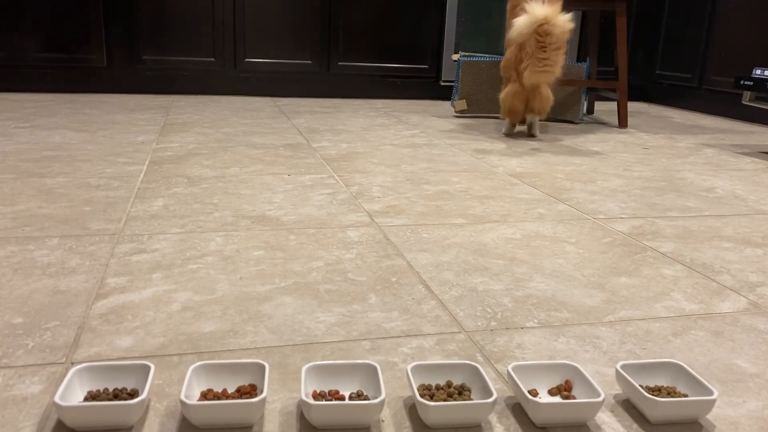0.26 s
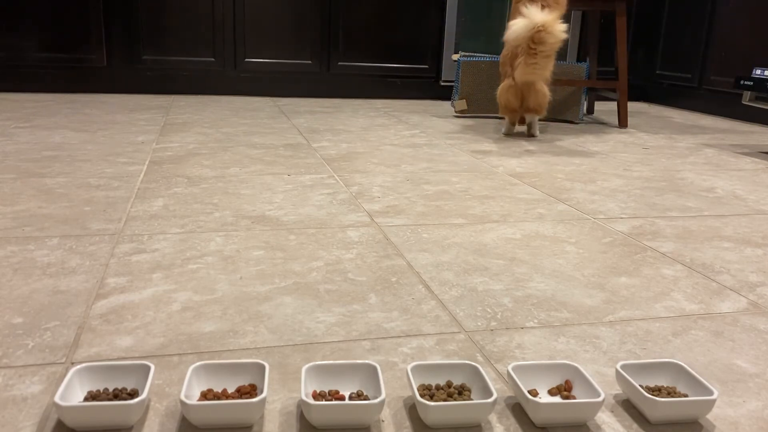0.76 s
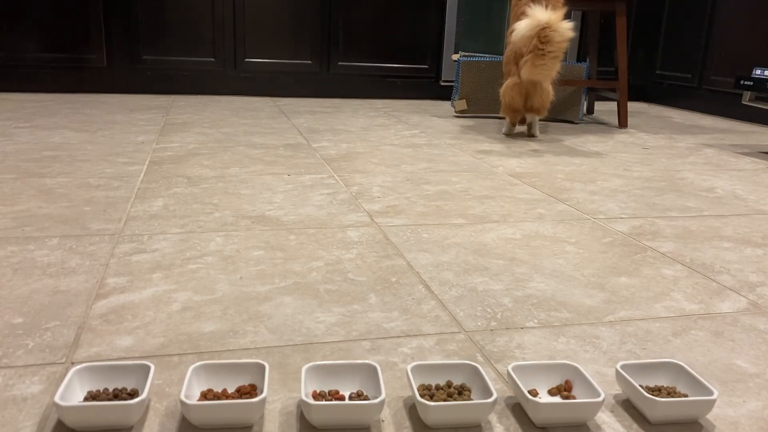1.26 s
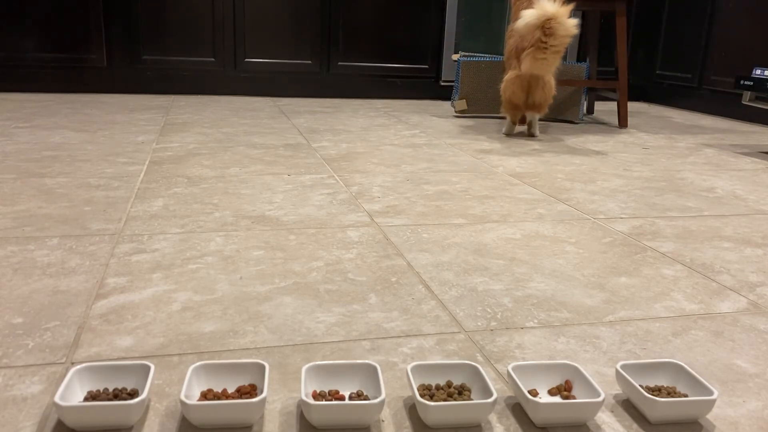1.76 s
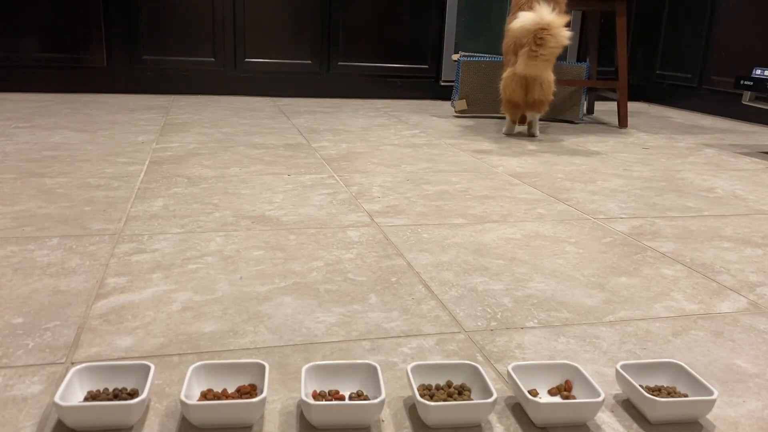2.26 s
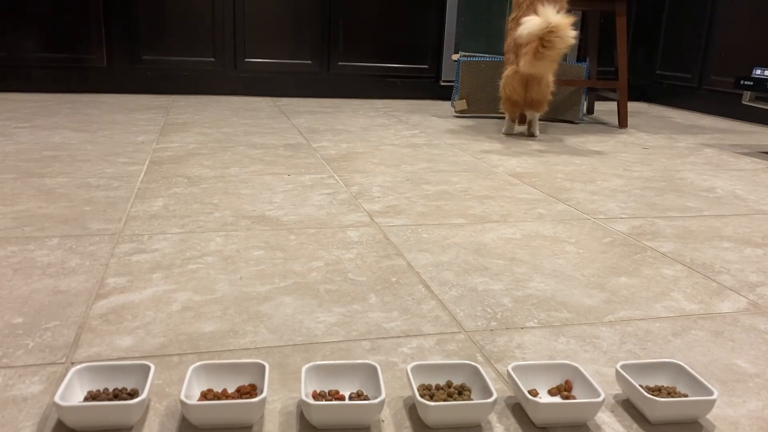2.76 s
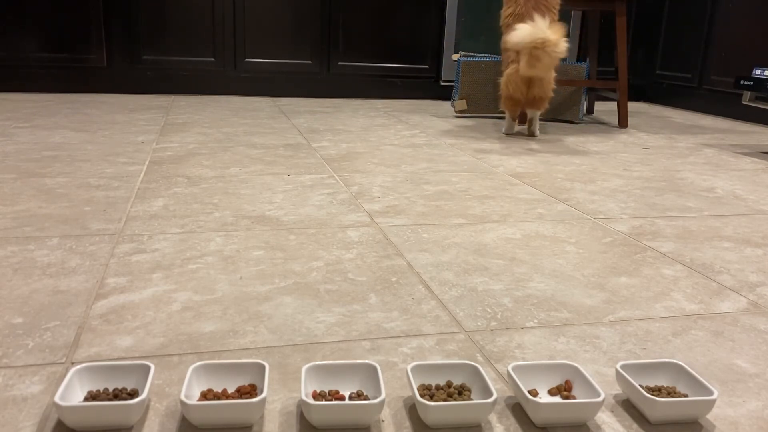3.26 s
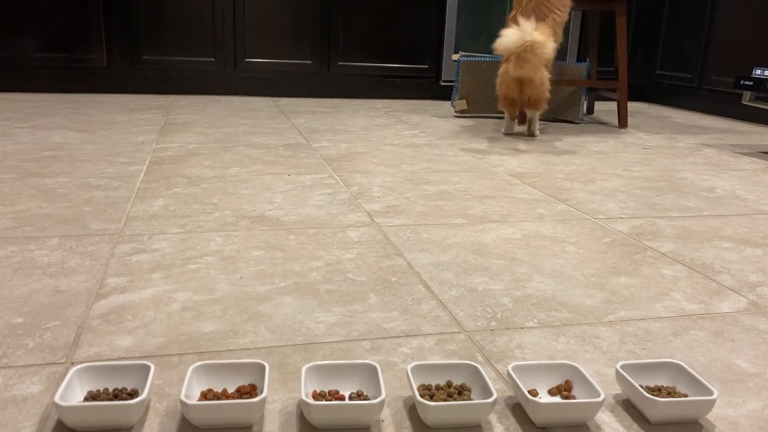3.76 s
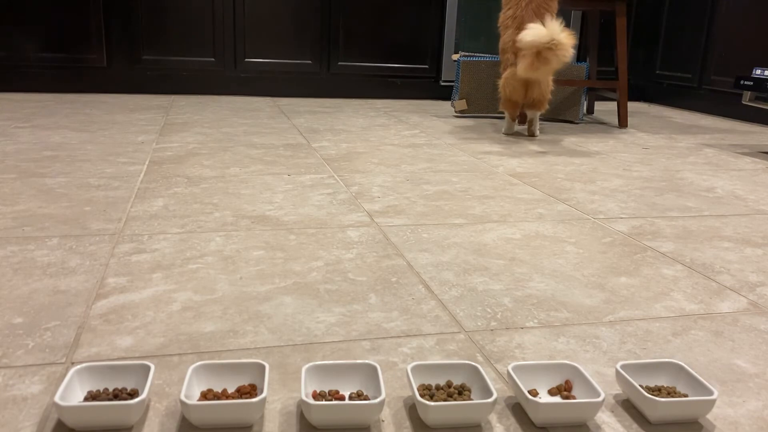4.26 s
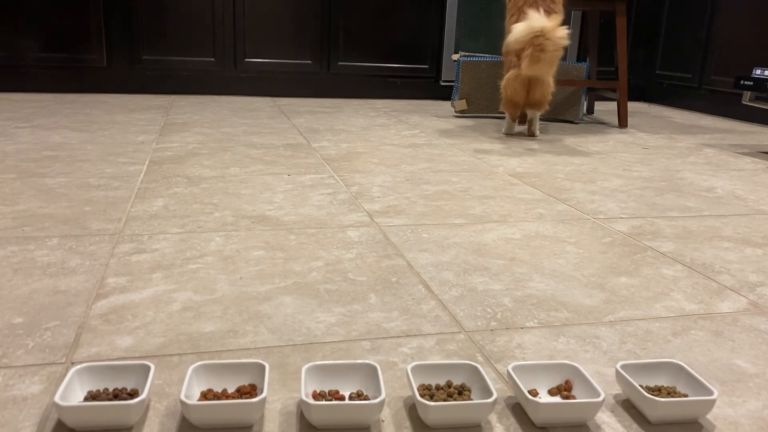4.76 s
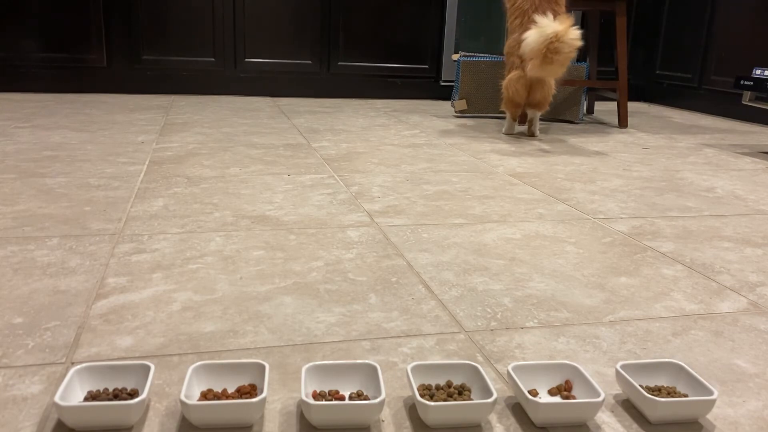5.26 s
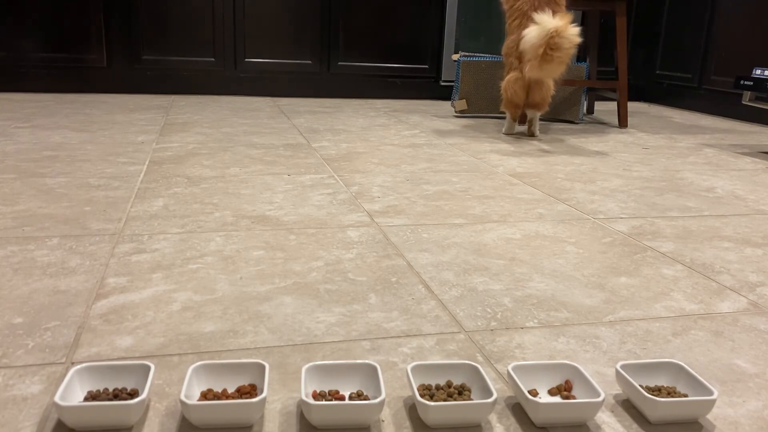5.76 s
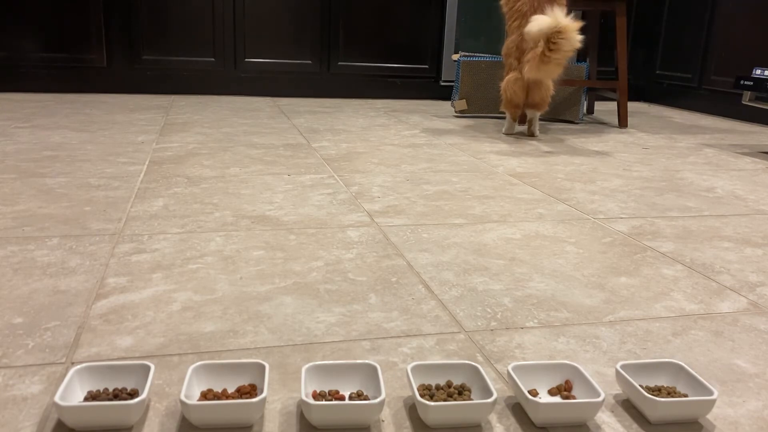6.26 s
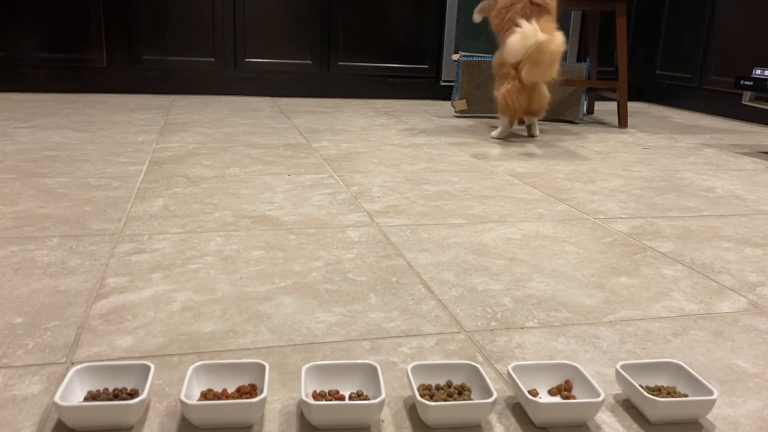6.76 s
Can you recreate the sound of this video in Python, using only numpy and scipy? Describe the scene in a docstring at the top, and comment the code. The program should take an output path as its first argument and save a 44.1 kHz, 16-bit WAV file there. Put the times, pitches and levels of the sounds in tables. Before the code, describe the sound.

Across a hard tiled room, a cat works its claws on a hollow box. Faint scrapes and ticks come first, then sharper crackling plucks with dull hollow thumps. Around two seconds the box judders briefly on the floor. Strong scratches peak until about three and a half seconds, then only a few isolated plucks remain over faint hum and hiss. The stereo microphone is several steps away.

```python
"""In a hard tiled room, a cat stands against a hollow box and works its front claws into it.
Each claw drags over tiny catches, then plucks free: fibres crack and tick, and the surface snaps back.
The box's panels thump as decaying modes; the box rocks, judders over the floor and sways with a rumble.
A microphone pair across the room hears the echoes and tail of every hit, over a low hum and faint hiss."""
import sys
import numpy as np
from scipy import signal
from scipy.fft import rfft, irfft, next_fast_len
from scipy.io import wavfile

SR = 44100
rng = np.random.default_rng(int(sys.argv[2]) if len(sys.argv) > 2 else 0)


def generate_wav(signal):
    """Clip the signal to [-1, 1] and save it as 16-bit WAV at the path in sys.argv[1]."""
    frames = np.transpose(np.atleast_2d(signal))
    scaled = np.clip(frames, -1, 1) * 32767
    pcm = np.round(scaled).astype(np.int16)
    wavfile.write(sys.argv[1], SR, pcm)


N = 309141  # length in samples

# Claws plucking free. Each row: time in seconds, snap in dB, crack in dB, tick in dB,
# thump of the box in dB before a small trim, shredding from 0 (one clean catch) to 1 (a long tear).
PLUCKS = [(0.002, -55.5, -53, -67, -52.5, 0.74), (0.107, -56, -55.5, -97, -61, 0.04),
          (0.175, -57.5, -62.5, -69, -51.5, 0), (0.392, -42, -46.5, -64, -47, 0.5),
          (0.541, -57, -63, -69, -56, 0.3), (0.593, -63, -62, -70.5, -74, 0.35),
          (0.654, -59.5, -64, -74.5, -59, 1), (0.802, -58, -78.5, -80.5, -53.5, 0),
          (0.909, -66.5, -77, -77.5, -55.5, 0.44), (1.224, -68, -74, -79.5, -57, 0.5),
          (1.277, -48, -47.5, -56, -47.5, 0.57), (1.655, -49.5, -47.5, -53, -40, 0.33),
          (2.006, -84, -71, -77, -65, 0.8), (2.225, -51.5, -59.5, -72.5, -42.5, 0.7),
          (2.262, -42.5, -44, -55.5, -33.5, 1), (2.509, -57, -64.5, -74.5, -52.5, 0.3),
          (2.585, -61, -60, -66, -60.5, 0.22), (2.712, -52, -54.5, -66.5, -51.5, 0.2),
          (2.869, -40.5, -41.5, -52, -41, 0.6), (2.970, -47, -48.5, -59, -50, 0.12),
          (3.249, -57.5, -71, -89.5, -43, 0.1), (3.341, -53.5, -52, -62.5, -45, 0.46),
          (3.418, -37, -47.5, -54, -33.5, 0.1), (3.963, -40.5, -49, -61.5, -43, 0.57),
          (4.639, -64.5, -67.5, -97, -55.5, 0.76), (5.627, -42.5, -57, -62, -38, 0.15)]
# Colour of a dull knock on the box. Each row: frequency in Hz, relative level in dB.
KNOCK_COLOUR = [(100, -36), (400, 2), (600, 9), (750, 3.5), (950, 1.5), (1300, -1), (2000, -10.5),
                (5000, -38.5)]


def gain_of(db):
    """Decibels to amplitude."""
    return 10 ** (np.asarray(db) / 20)


def evened(x):
    """Scales to rms 1."""
    return x / np.sqrt(np.mean(x ** 2) + 1e-20)


def read(points, hz):
    """Reads a table on a logarithmic frequency axis."""
    f, value = np.transpose(points)
    return np.interp(np.log(hz + 1), np.log(f + 1), value)


def add(mix, s, sound):
    """Adds a stereo sound at time s."""
    part = mix[:, max(round(s * SR), 0):][:, :sound.shape[1]]
    part += sound[:, :part.shape[1]]


def at_level(wet, db, size=1500):
    """Sets a hit's rms level over its first moments (size in samples)."""
    return gain_of(db) * wet / np.sqrt(np.mean(wet[:, :size] ** 2) + 1e-20)


def click(colour, size=2048):
    """The minimum-phase click: the most compact causal one with a given spectrum."""
    log_gain = np.log(gain_of(read(colour, abs(np.fft.fftfreq(size, 1 / SR)))))
    spectrum = np.exp(np.conj(signal.hilbert(log_gain)))
    return np.fft.ifft(spectrum).real[:size // 2]


def diffuse(pair):
    """Makes two unrelated signals as alike as two close microphones hear a room."""
    # Likeness of the channels. Each row: frequency in Hz, likeness from 0 to 1.
    likeness = [(60, 0.93), (150, 0.9), (350, 0.5), (700, .25), (1400, 0.05), (3000, 0.5), (5500, 0.4),
                (7500, 0.9), (16000, 1)]
    a, b = rfft(pair)
    same = np.clip(read(likeness, np.fft.rfftfreq(pair.shape[1], 1 / SR)), -1, 1)
    common = np.sqrt((1 + same) / 2) * a
    apart = np.sqrt((1 - same) / 2) * b
    return irfft([common + apart, common - apart], pair.shape[1])


def room(build_s=0.0059, direct=1.0, size=20000):
    """Direct sound, first echoes, and a dense noise tail drawn afresh for each place."""
    # The tail. Each row: frequency in Hz, decay by 60 dB in seconds, relative level in dB.
    tail_bands = [(102.3, 0.3, 9), (330, 0.43, 9.5), (630, 0.53, 12), (1210, 0.46, 15), (2920, .47, 10.5),
                  (7000, 0.4, 10.5), (11150, .33, 7.5), (15040, 0.16, 8)]
    # Echoes from floor and cabinets. Each row: delay in seconds, strength, right microphone's lead in seconds.
    echoes = [(.0053, -.45, .00005), (.0064, .75, .00002), (.0075, .45, .0001), (.0115, -.5, -.00005),
              (.0165, .5, .0001), (.0242, .3, -.0001)]
    hz, t, z = signal.stft(diffuse(rng.standard_normal((2, size))), SR, nperseg=512)
    t60, level_db = (read(np.array(tail_bands)[:, [0, k]], hz)[:, None] for k in (1, 2))
    z *= gain_of(level_db - 60 * t / t60)
    z *= np.sqrt(2 * np.log(1000) / t60 / SR)  # equal energy for any decay time
    build = 1 - np.exp(-(np.arange(size) / SR / build_s) ** 2)
    response = signal.istft(z, SR)[1][:, :size] * build
    low = signal.firwin(25, 6000, fs=SR)
    for delay, strength, lead in [(0.0014, direct, .00013)] + echoes:
        right = np.zeros(size)
        right[round(delay * SR) + len(low) // 2] = strength
        # below about 6 kHz the left microphone hears it later by the lead (sooner if negative)
        lag = np.roll(right, round(lead * SR)) - right
        response += [right + np.convolve(lag, low, "same"), right]
    return response


def carry(sound, space):
    """Carries a short sound through the room to both microphones."""
    return signal.fftconvolve(sound[None], space, axes=1)


def cornered(space, early_s=0.02, tail_db=-6):
    """Close to floor and cabinets, the box's early echoes outweigh the room's tail in its thump."""
    t = np.arange(space.shape[1]) / SR
    return space * gain_of(tail_db / (1 + np.exp(-4 * (t / early_s - 1))))


def facing(space, shredding, clean_db=6.5, size=150):
    """A clean single catch aims more of its sound straight at the microphones than a long tear."""
    boost = gain_of(clean_db * np.clip(1 - shredding, 0, 1) ** 3)
    return space * np.where(np.arange(space.shape[1]) < size, boost, 1)


def background(air_db=-67, hum_hz=64, hum_width_hz=5, hum_db=-70.5):
    """Still room air as coloured noise, and a low hum as narrow noise that wavers about a steady level."""
    # Colour of the air. Each row: frequency in Hz, relative level in dB.
    air_colour = [(15, -57), (25, -39.5), (43, -12), (64, -3.5), (134, -22.5), (166, -18), (190, -24.5),
                  (223, -18.5), (373, -28.5), (476, -28), (531, -33.5), (911, -34.5), (1230, -42),
                  (11000, -54.5), (14000, -60), (16000, -68.5)]
    hz = np.fft.rfftfreq(N, 1 / SR)
    air = irfft(rfft(diffuse(rng.standard_normal((2, N)))) * gain_of(read(air_colour, hz)), N)
    hum = irfft(rfft(rng.standard_normal(N)) / (1 + ((hz - hum_hz) / hum_width_hz) ** 2), N)
    return gain_of(air_db) * evened(air) + gain_of(hum_db) * evened(hum)


def rumble(shaking, settle_s=0.057, level_db=-59):
    """The whole box sways with a low rumble that swells whenever it is shaken and then settles."""
    # Colour of the swaying box. Each row: frequency in Hz, relative level in dB.
    rumble_colour = [(15, -44.5), (36, -12), (62, -3), (100, -0.5), (140, -8), (220, -21), (600, -67)]
    keep = np.exp(-1 / (settle_s * SR))
    power = signal.lfilter([1 - keep], [1, -keep], (shaking ** 2).mean(0))
    sway = np.sqrt(power)
    colour_gain = gain_of(read(rumble_colour, np.fft.rfftfreq(N, 1 / SR)))
    noise = irfft(rfft(rng.standard_normal(N)) * colour_gain, N)
    return gain_of(level_db) * evened(sway) * evened(noise)


def box(push_s, soft_hz, spread_db=2, size=6000):
    """Panels ring after a push; a soft push spares the upper modes, and each hit stirs them differently."""
    # Modes of the box. Each row: frequency in Hz before a random detune, relative level in dB
    # before a random spread, decay by 60 dB in seconds.
    modes = [(88, -10, .1), (114, -9, .07), (155, -8, .07), (243, -3, .07), (300, 1, .1), (332, -5, .06),
             (386, -3, .08), (465, -4, .04), (530, -2.5, .04), (630, -6, .04)]
    t = np.arange(size) / SR
    hz, db, t60 = np.transpose(modes)[:, :, None]
    luck, detune = rng.standard_normal((2, len(modes), 1))
    signs = (-1) ** np.arange(len(modes))[:, None]
    strength = signs * gain_of(db + spread_db * luck) / np.hypot(1, hz / soft_hz)
    decay = np.exp(-np.log(1000) * t / t60)
    ring = strength * decay * np.sin(2 * np.pi * hz * (1 + 0.045 * detune) * t)
    return ring.sum(0) * (1 - np.exp(-t / push_s))


def bumps(rows, places, thump_trim_db=1.0, knock_trim_db=-1):
    """The box rocks: each push gives a slow thump and a dull knock."""
    out = np.zeros((2, N))
    for k, (s, thump_db, knock_db) in enumerate(rows):
        here = places[k % len(places)]
        thump = carry(box(push_s=0.011, soft_hz=413), cornered(here))
        knock = carry(click(KNOCK_COLOUR), here)
        add(out, s, at_level(thump, thump_db + thump_trim_db))
        add(out, s, at_level(knock, knock_db + knock_trim_db))
    return out


def rub(force, colour, catches_per_s, spread_db):
    """Friction: many tiny catches of uneven size under a force, heard through the room."""
    sizes = gain_of(spread_db * np.minimum(rng.exponential(1, N), 4)) * rng.choice([-1, 1], N)
    impulses = sizes * (rng.random(N) < catches_per_s / SR)
    catches = evened(signal.oaconvolve(impulses, click(colour))[:N])
    space = room()
    space = space / np.linalg.norm(space[0])
    return signal.oaconvolve((catches * force)[None], space, axes=1)[:, :N]


def slide(places, count=4, start_s=2.058, every_s=0.037, decay_s=0.027):
    """Pulled hard, the box sticks and slips over the tiles in even slips that grow as the pull builds."""
    # Colour of the box rubbing over the tiles. Each row: frequency in Hz, relative level in dB.
    judder_colour = [(45, -24), (88, 17.5), (115, 12), (152, 15.5), (190, -2), (270, 3.5), (400, 2.5),
                     (620, 7.5), (1000, -2.5), (1350, -14), (2000, -31.5), (6000, -58)]
    full_db, first_db, pull_build_s = -43, -12, 0.048  # first_db: the first slip against full level
    thump_db, knock_db = 3, -9  # against the slip, before the trims in bumps
    t = np.arange(N) / SR
    after = every_s * np.arange(count)
    slips = list(zip(start_s + after, full_db + first_db * np.exp(-after / pull_build_s)))
    force = sum(gain_of(db) * np.exp(-abs(t - s) / decay_s) * (t > s) for s, db in slips)
    jolts = [(s, db + thump_db, db + knock_db) for s, db in slips]
    return rub(force, judder_colour, catches_per_s=1300, spread_db=4) + bumps(jolts, places)


def drags(dig_s=0.038, dig_db=-6, dig_curve=3.1):
    """A claw catches on many tiny fibres: in light scrapes, and ever harder just before each pluck."""
    # Light scrapes of claws, some leading into a pluck.
    # Each row: start in seconds, length in seconds, level in dB.
    scrapes = [(0, 0.15, -63), (.6, 0.19, -72), (0.763, 0.27, -77.5), (1.785, 0.089, -64),
               (1.984, 0.11, -64), (2.455, 0.15, -68), (3.869, 0.037, -76), (5.573, 0.039, -67.5)]
    # Colour of a dragged claw. Each row: frequency in Hz, relative level in dB.
    scrape_colour = [(200, -19.5), (800, 14.5), (1400, 10), (3000, 6), (5000, 1), (8000, -15),
                     (16000, -21.5)]
    t = np.arange(N) / SR
    pressure = sum(gain_of(db) * np.sqrt(np.maximum(t - s, 0) / length) * (t < s + length)
                   for s, length, db in scrapes)
    for s, snap_db, *_ in PLUCKS:
        digging = (t > s - dig_s) & (t < s)
        # rises to dig_db against the snap that ends it
        pressure[digging] += gain_of(snap_db + dig_db) * abs(1 - (s - t[digging]) / dig_s) ** dig_curve
    return rub(pressure, scrape_colour, catches_per_s=420, spread_db=3.0)


def snap(tautness):
    """The released surface flicks back, at a higher pitch where it is tauter."""
    # Colour of the snap. Each row: frequency in Hz before the tautness factor, relative level in dB.
    snap_colour = [(300, -29.5), (720, -4.5), (860, 3), (1100, 1.5), (1400, 3.5), (1800, 1), (2200, -4.5),
                   (2800, -32), (6000, -58)]
    return click(np.array(snap_colour) * [tautness, 1])


def tear(colour, shredding, spaces, fibres_per_s=900, last_s=0.012, size=1500):
    """One fibre breaks, and smaller ones follow from a spot next to it."""
    t = np.arange(size) / SR
    first = signal.unit_impulse(size)
    later = rng.standard_normal(size) * (rng.random(size) < fibres_per_s / SR) * np.exp(-t / last_s)
    later *= shredding / (np.linalg.norm(later) + 1e-9)
    return carry(click(colour), carry(first, spaces[0]) + carry(later, spaces[1]))


def plucks(places, thump_trim_db=0.36, knock_db=-6, knock_follow=0.35, snap_lag_s=0.00047, scatter=0.15):
    """A claw comes free: fibres crack, the surface snaps back, the box rings; heavy thumps knock harder."""
    # Colour of the fibres' crack. Each row: frequency in Hz, relative level in dB.
    crack_colour = [(300, -48.5), (1400, -10.5), (2100, 4.5), (2600, 2.5), (3400, 1), (4700, -1),
                    (6000, -18), (9000, -16.5), (16000, -54)]
    # Colour of the claw tip's tick. Each row: frequency in Hz, relative level in dB.
    tick_colour = [(1000, -29.5), (4000, -12.5), (6000, 8.5), (7800, 7.5), (10000, 2.5), (12500, -1.5),
                   (16000, -8.5)]
    out = np.zeros((2, N))
    for k, (s, snap_db, crack_db, tick_db, thump_db, shredding) in enumerate(PLUCKS):
        place, beside = places[k % len(places)], places[(k + 1) % len(places)]
        here = facing(place, shredding)
        tautness = 1 + scatter * rng.uniform(-1, 1)
        flick = carry(snap(tautness), facing(place, shredding / 2, clean_db=11))
        knock = carry(click(KNOCK_COLOUR), place)
        knock_level_db = snap_db + knock_db + knock_follow * (thump_db - snap_db)
        thump = carry(box(push_s=0.0028, soft_hz=860), cornered(place))
        add(out, s, at_level(tear(crack_colour, shredding, (here, beside)), crack_db))
        add(out, s, at_level(tear(tick_colour, shredding, (here, beside)), tick_db))
        add(out, s + snap_lag_s, at_level(flick, snap_db))
        add(out, s + snap_lag_s, at_level(knock, knock_level_db))
        add(out, s, at_level(thump, thump_db + thump_trim_db))
    return out


def scene(count=14, pluck_sway_db=-12):
    """The cat's paws move around a set of places on the box; pushes sway it more than plucks do."""
    # Paws pushing the box. Each row: time in seconds, thump in dB and knock in dB before the trims in bumps.
    pushes = [(0.044, -55, -59), (0.228, -61.5, -61), (0.515, -57.5, -79), (0.682, -58.5, -61),
              (1.06, -63.5, -74), (1.345, -50.5, -64), (1.385, -59, -75), (1.472, -57, -68.5),
              (1.528, -55.5, -70.5), (1.572, -62.5, -68.5), (1.75, -57.5, -52.5), (1.815, -49, -52.5),
              (1.838, -53, -58.5), (1.885, -64, -66.5), (2.455, -56, -71), (2.54, -52, -77),
              (2.665, -56, -78)]
    places = [room() for _ in range(count)]
    claws = plucks(places)
    rocking = bumps(pushes, places) + slide(places)
    swaying = rumble(rocking + gain_of(pluck_sway_db) * claws)
    return claws + rocking + swaying + drags() + background()


def record(dry, edge_hz=16000):
    """The recorder's channel balance and stereo widening, then its band limit."""
    # Balance. Each row: frequency in Hz, left minus right in dB.
    balance = [(60, 1), (200, -3), (320, -3.5), (650, -0.5), (1300, -0.4), (2400, .5), (4400, 3),
               (8000, 0.2), (16000, 0)]
    # The recorder's stereo widening turns the treble's phase in steps.
    # Each row: frequency in Hz, half turns by which left leads.
    treble_phase = [(0, 0), (7300, 0), (8500, -1), (9500, -1), (10400, -2), (11600, -2), (12600, -3),
                    (13700, -3), (14600, -4), (16100, -4)]
    size = next_fast_len(N + SR)
    hz = np.fft.rfftfreq(size, 1 / SR)
    sides = np.array([[1], [-1]])  # each side takes half the difference
    half_turns = np.interp(hz, *np.transpose(treble_phase))
    widening = np.exp(sides * .5j * np.pi * half_turns)
    channels = gain_of(sides * read(balance, hz) / 2) * widening
    pair = irfft(rfft(dry, size) * channels, size)[:, :N]
    band_limit = signal.firwin(511, edge_hz, window=("kaiser", 9), fs=SR)
    return signal.oaconvolve(pair, band_limit[None], "same")


dry = scene()
out = record(dry)
generate_wav(out)
```